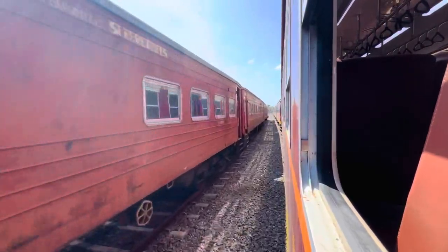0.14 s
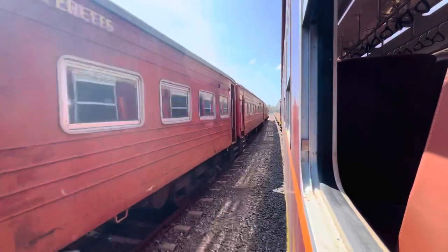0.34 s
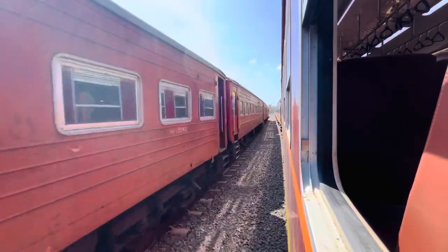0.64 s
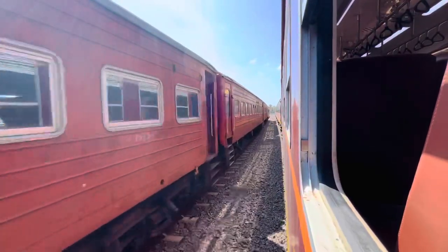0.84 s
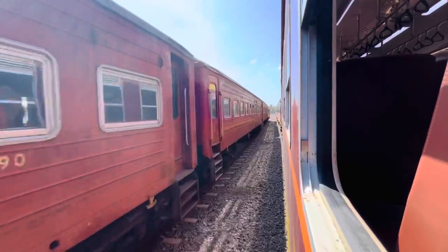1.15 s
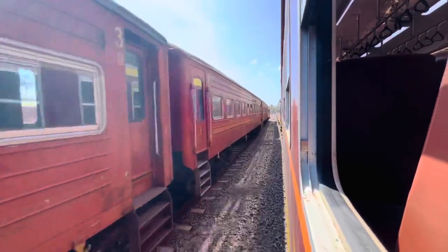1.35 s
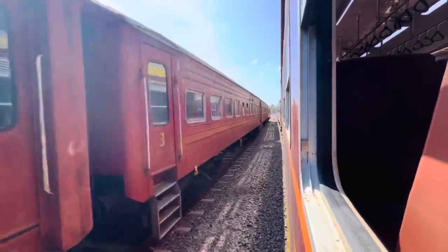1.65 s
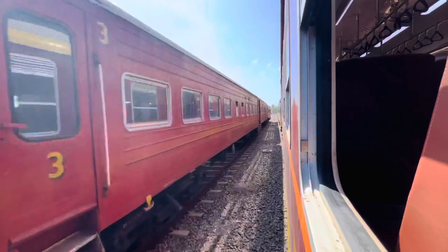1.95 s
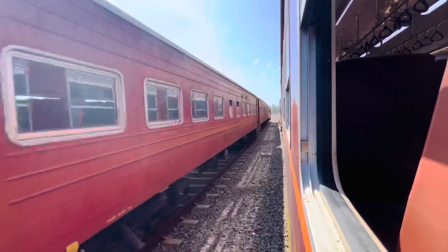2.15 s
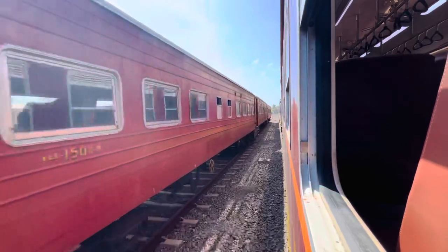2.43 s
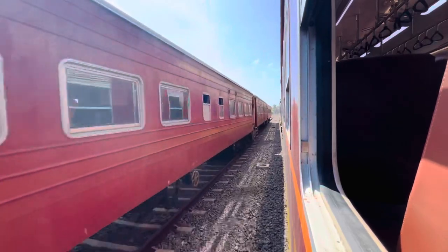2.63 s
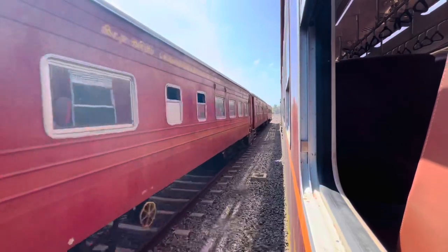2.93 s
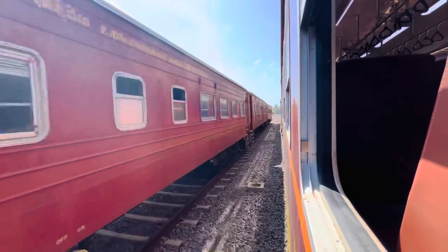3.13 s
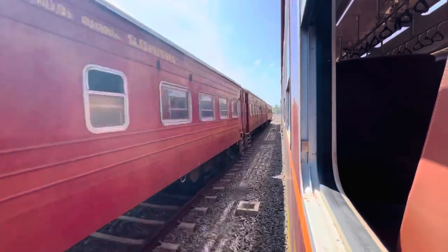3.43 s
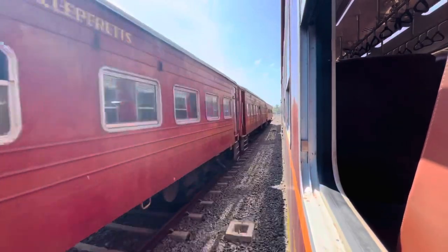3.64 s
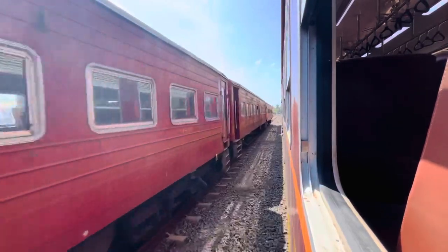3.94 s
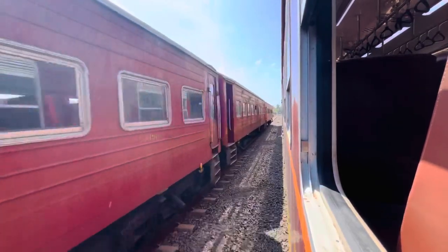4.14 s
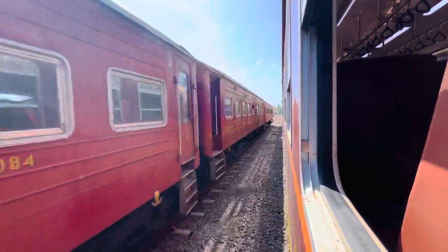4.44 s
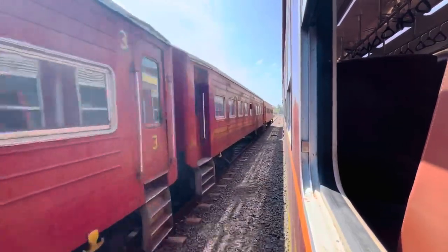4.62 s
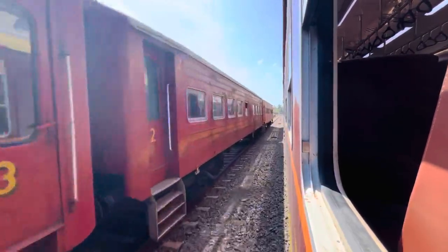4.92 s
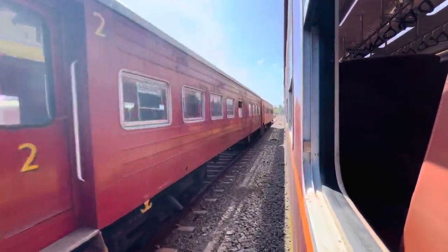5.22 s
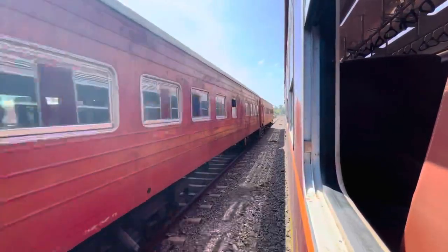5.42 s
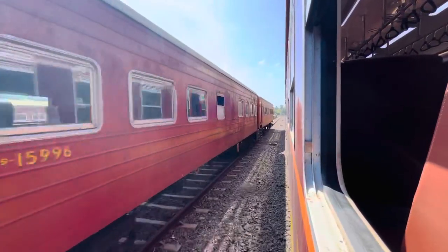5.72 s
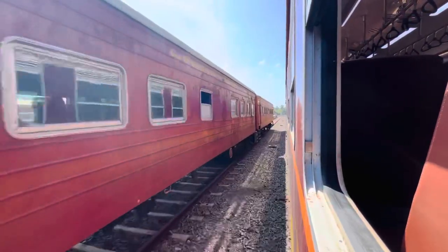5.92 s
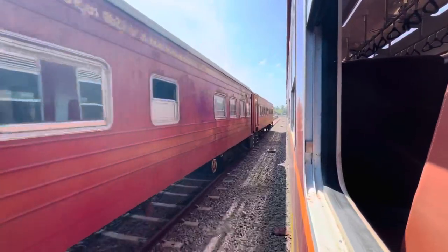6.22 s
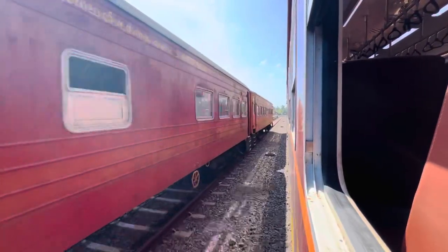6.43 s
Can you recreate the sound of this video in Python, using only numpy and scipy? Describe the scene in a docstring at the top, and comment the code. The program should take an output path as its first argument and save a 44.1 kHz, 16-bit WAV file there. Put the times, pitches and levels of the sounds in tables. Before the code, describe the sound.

Train carriages roll slowly past an open window, about two metres away and slightly to the left. A low rumble continues throughout under a gritty hiss of wheels scraping the rail, while thin, high squeals swell and fade. Several sharp clacks over a rail joint come in the first half. The scraping and squealing grow loudest past the middle, with a few more ringing clacks and thuds, then ease a little.

```python
"""A low rumble and a gritty hiss, with thin squeals on top: a train of carriages creeps past an open
window, two metres away on the left. The wheels rumble as they roll, and their flanges (the lips that
keep them on the track) scrape the rail. Axles clack over a rail joint, and the scraping sets the wheel
rims squealing at their own pitches. Below 8 kHz the left side is heard slightly ahead of the right."""
import sys
import numpy as np
from scipy import signal
from scipy.fft import rfft, irfft, next_fast_len
from scipy.io import wavfile
from scipy.ndimage import uniform_filter1d

SR = 44100
rng = np.random.default_rng(int(sys.argv[2]) if len(sys.argv) > 2 else 0)


def inscribe(sig):
    """Save sig as 16-bit PCM at rate SR to the path in sys.argv[1].

    A 1-D sig is mono; a 2-D sig holds one channel per row.
    Samples are clipped to [-1, 1] before scaling.
    """
    pcm = np.round(np.clip(np.atleast_2d(sig).T, -1, 1) * 32767)
    wavfile.write(sys.argv[1], SR, pcm.astype(np.int16))


N = 289737


def from_db(db):
    """Turn decibels into a number to multiply by."""
    return 10 ** (np.asarray(db) / 20)


def rms_one(x):
    """Scale a signal so that its average power is 1."""
    return x / np.sqrt(np.mean(x ** 2) + 1e-20)


def in_time(rows):
    """Join timed rows with straight lines: one curve for each column after the time."""
    times, *columns = np.transpose(rows)
    return [np.interp(np.arange(N) / SR, times, column) for column in columns]


def at_hz(points, hz):
    """Look up a value between the rows of a table of pitches, going by octaves."""
    pitches, values = np.transpose(points)
    return np.interp(np.log(hz), np.log(pitches), values)


def drift(rate):
    """A random curve of typical size 1 that turns about rate times a second."""
    step = 40   # samples between points of the curve
    r = np.exp(-2 * np.pi * rate * step / SR)
    slow = signal.lfilter([1], [1, -2 * r, r * r], rng.standard_normal(N // step + 2002))[2000:]
    return np.interp(np.arange(N) / step, np.arange(len(slow)), rms_one(slow))


def resonate(x, hz, width_hz):
    """Make a signal ring at one pitch; the narrower the width, the longer it rings."""
    r = np.exp(-np.pi * width_hz / SR)
    gain = (1 - r * r) / 2
    return signal.lfilter([gain, 0, -gain], [1, -2 * r * np.cos(2 * np.pi * hz / SR), r * r], x)


def spread(pair, alike, pan_db):
    """Mix two signals into left and right: alike at 1 gives both one wave, pan_db favours the left."""
    alike = np.clip(alike, 0, 1)
    both = np.sqrt(1 + alike) * pair[0] + np.sqrt(1 - alike) * pair[1] * [[1], [-1]]
    return both * from_db([[pan_db / 2], [-pan_db / 2]])


# How alike the two sides sound. Each row: pitch in Hz, likeness from 0 to 1.
SIDES_ALIKE = [(60, 0.82), (300, 0.78), (700, 0.31), (1500, 0.5), (3000, 0), (6000, 0), (10000, 0.86),
               (14000, 0.06)]
# How far the sound leans left. Each row: pitch in Hz, left level over right in dB.
LEFT_LOUDER = [(60, -0.5), (150, 0), (380, 4), (950, 3.5), (2380, 0.5), (5960, 3), (15000, -2.5)]


def banded_noise(spectrum, patchy_db, flicker_hz, tilt_db=0, pivot_hz=1000):
    """Stereo noise in flickering bands; tilt_db brightens it by that much per octave around pivot_hz."""
    hz_from, hz_to = spectrum[0][0], min(spectrum[-1][0], .45 * SR)
    edges = np.geomspace(hz_from, hz_to, 2 + int(3 * np.log2(hz_to / hz_from)))   # about 3 to an octave
    white = rng.standard_normal((2, 2, N))
    together = drift(flicker_hz / 2)
    out, power = 0, 0
    for k, (low, high) in enumerate(zip(edges, edges[1:])):
        hz = np.sqrt(low * high)
        band = signal.sosfilt(signal.butter(2, [low, high], "band", fs=SR, output="sos"), white[k % 2])
        band = spread(band, at_hz(SIDES_ALIKE, hz), at_hz(LEFT_LOUDER, hz))
        band *= from_db(at_hz(spectrum, hz))
        power += np.mean(band ** 2)
        flicker_db = patchy_db * (0.15 * together + drift(flicker_hz))
        out = out + band * from_db(tilt_db * np.log2(hz / pivot_hz) + flicker_db)
    return out / np.sqrt(power)


# How the rolling rises and falls. Each row: time in seconds, rumble level in dB, roar level in dB,
# rumble brightness in dB per octave.
ROLLING_LEVELS = [(0.0, -29.5, -32, -6), (0.6, -27.5, -33.5, -2), (1.4, -28, -31, -11),
                  (2.0, -27.5, -32.5, -3.5), (3.0, -30, -32, -1.5), (3.6, -27, -32, -3.5),
                  (4.4, -31, -31, 3), (4.55, -28, -30.5, -6), (4.95, -34, -30.5, 2),
                  (5.5, -30.5, -33.5, 7.5), (5.95, -28, -32, -3), (6.57, -34.5, -33, 5)]
# The tone of the car bodies' rumble. Each row: pitch in Hz, relative level in dB.
RUMBLE_TONE = [(32, -16), (45, -2.5), (57, 3), (75, 2.5), (100, 4), (130, -1.5), (200, -33), (280, -12)]
# The tone of the wheels' roar. Each row: pitch in Hz, relative level in dB.
ROAR_TONE = [(130, -16), (200, -5), (290, -17), (370, -11.5), (640, -15.5), (800, -17), (1090, -16.5),
             (2200, -24), (2700, -22.5), (3300, -37), (4200, -19.5)]
# Wheel and rail humming. Each row: pitch in Hz, width in Hz, level against the roar in dB.
STEEL_HUMS = [(375, 32, -14.5), (770, 53, -13.5), (1708, 15, -22.5), (2260, 8.4, -21), (72.4, 29, -6)]


def rolling():
    """Rough wheels roll on the rail: the car bodies rumble, and the steel hums faintly in the roar."""
    rumble_db, roar_db, tilt_db = in_time(ROLLING_LEVELS)
    roar = banded_noise(ROAR_TONE, patchy_db=2.0, flicker_hz=11.1)
    for hz, width_hz, level_db in STEEL_HUMS:
        hum = rms_one(resonate(rng.standard_normal((2, N)), hz, width_hz))
        roar += from_db(level_db) * spread(hum, at_hz(SIDES_ALIKE, hz), at_hz(LEFT_LOUDER, hz))
    rumble = banded_noise(RUMBLE_TONE, patchy_db=2.5, flicker_hz=24.0, tilt_db=tilt_db, pivot_hz=79.5)
    return from_db(rumble_db) * rumble + from_db(roar_db) * roar


# How loud and bright the hiss is; it jumps up abruptly near 4.5 s.
# Each row: time in seconds, hiss level in dB, brightness in dB per octave.
SCRAPE_LEVELS = [(0.0, -29.5, -2), (0.35, -34.5, 0.5), (0.99, -35.5, 0.5), (1.06, -28, -1.5),
                 (1.17, -25, -3.5), (1.21, -24, -1), (1.3, -26.5, -2), (1.45, -28.5, 0.5),
                 (2.0, -30.5, -9.5), (2.25, -36.5, -6.5), (2.4, -34, -2.5), (2.8, -38.5, -1),
                 (3.16, -37.5, 1), (3.52, -33.5, -2), (3.56, -31.5, 2.5), (3.7, -26, -3), (3.83, -31, 1),
                 (3.85, -24.5, -4), (3.95, -22.5, -5.5), (4.08, -22, -7), (4.14, -27, -4.5),
                 (4.25, -35, -3), (4.47, -41, 2), (4.49, -24.5, -4.5), (4.6, -26.5, -4), (4.66, -19.5, -4),
                 (4.78, -19, -9.5), (4.88, -24.5, -4.5), (4.99, -20.5, -7.5), (5.15, -21, -4.5),
                 (5.3, -22.5, -6.5), (5.55, -29, -6.5), (5.95, -27, -1), (6.25, -26.5, -5),
                 (6.45, -27.5, -7.5), (6.57, -37.5, -1)]
# The tone of the hiss. Each row: pitch in Hz, relative level in dB.
HISS_TONE = [(2500, -19.5), (3400, -12), (4000, -7.5), (5200, -1), (6800, 3), (8400, -3), (10000, 1),
             (12500, -9.5), (14500, 0)]
# Faint ringing of the wheels. Each row: pitch in Hz, width in Hz, level against the hiss in dB.
WHEEL_WHISTLES = [(2900, 160, -24), (3350, 120, -25), (3830, 120, -19), (4900, 120, -24), (6900, 200, -20),
                  (13650, 300, -12)]


def scrape():
    """Flanges grind along the rail: a bright, gritty hiss with faint whistles."""
    hiss_db, tilt_db = in_time(SCRAPE_LEVELS)
    hiss = banded_noise(HISS_TONE, patchy_db=1.6, flicker_hz=7.0, tilt_db=tilt_db, pivot_hz=6000)
    for hz, width_hz, level_db in WHEEL_WHISTLES:
        whistle = rms_one(resonate(rng.standard_normal(N), hz, width_hz))
        hiss += from_db(level_db + tilt_db * np.log2(hz / 5200) + 3.0 * drift(3.1)) * whistle
    hiss *= from_db(hiss_db + drift(33))   # a fast flicker makes it gritty
    return signal.sosfilt(signal.ellip(8, .5, 40, 13900, fs=SR, output="sos"), hiss)   # cut the very top


def favour(hz, favoured_hz, boost_db, octaves):
    """A gain that makes pitches near the favoured one stand out."""
    return from_db(boost_db * np.exp(-(np.log2(hz / favoured_hz) / octaves) ** 2))


TICK_LEAD_S = .009   # the tick comes this long before the blow


def wheel_knocks(t, rattle_s, blow_db):
    """A wheel drops over the gap: a light tick, a hard blow, then uneven knocks that die away."""
    tick_db, strike_db, fade_db_per_s = -11, 13, 100
    attack_s, blow_s, settle_s = .005, .014, .02
    age = t - TICK_LEAD_S
    onset = np.where(age < 0, from_db(tick_db), np.clip(0.37 + age / attack_s, 0, 1))
    blow = from_db(blow_db * (age > 0) * np.exp(-age / blow_s))
    settle_db = -4.0 * (1.5 - np.exp(-np.maximum(age - rattle_s, 0) / settle_s))
    shape = onset * blow * from_db(settle_db - fade_db_per_s * t)
    uneven = from_db(1.05 * np.repeat(rng.standard_normal(len(t) // 126), 126))   # 3 ms for each knock
    knocks = rng.standard_normal((2, len(t))) * shape * uneven
    knocks[0, round((TICK_LEAD_S + attack_s) * SR)] += from_db(strike_db + blow_db)   # one hard contact
    return knocks


# The tone of the rattle. Each row: pitch in Hz, relative level in dB.
RATTLE_TONE = [(71, -52), (120, -0.5), (425, 1), (718, -3.5), (844, 1.5), (941, -6), (1070, -4),
               (1600, -11.5), (2450, -16), (2880, -12), (3270, -14), (4500, -14.5), (6050, -19),
               (9000, -26), (11700, -63), (19800, -120)]


def bogie_rattle(knocks, t, tilt_db, favoured_hz):
    """The knocks shake the bogie, the frame that holds the wheels; the treble dies first."""
    hz = np.fft.rfftfreq(len(t), 1 / SR) + 1
    colour = from_db(at_hz(RATTLE_TONE, hz) + tilt_db * np.log2(np.clip(hz, 100, 9000) / 800))
    colour *= favour(hz, favoured_hz, boost_db=4, octaves=.7)
    rattle = irfft(rfft(knocks) * rms_one(colour), len(t))
    treble = signal.sosfilt(signal.butter(2, 2200, "high", fs=SR, output="sos"), rattle)
    return rattle - treble * (1 - from_db(-200 * t))


# The notes of struck wheel and rail. Each row: pitch in Hz, relative level in dB, seconds to fade 60 dB.
STEEL_NOTES = [(180, 0, .1), (250, -1, .1), (350, -2, 0.16), (452, 1, .14), (575, 1, 0.12), (795, 1.5, .11),
               (1050, -3, .06), (1220, -1, 0.07), (1620, -10, 0.05), (1850, -9, .05), (2240, -6, 0.07),
               (2845, -3, 0.09), (4150, -13, 0.04)]


def steel_ring(knocks, tilt_db, high_db, favoured_hz):
    """Wheel and rail ring at their own pitches; each blow strikes each note with its own strength."""
    ring = 0
    for hz, level_db, fade_s in STEEL_NOTES:
        width_hz = np.log(1000) / (np.pi * fade_s)
        bright_db = high_db * (hz > 1400) + tilt_db * np.log2(hz / 800)
        strength = from_db(level_db + bright_db + rng.normal(0, 2))
        strength *= favour(hz, favoured_hz, boost_db=6, octaves=.3)
        ring = ring + strength * resonate(knocks, hz, width_hz)
    return ring


# Axles crossing the joint. Each row: start in seconds, rattle gain in dB, thud gain in dB, ring gain on
# top of the rattle's in dB, brightness in dB per octave, seconds until the rattle settles, blow boost
# in dB, boost of the high steel notes in dB, favoured pitch in Hz, boom level in dB, boom delay in seconds.
AXLE_HITS = [(0.676, -17, -1, 8.5, 2, 0.062, 4.5, 5.5, 445, -15, 0.047),
             (0.925, -37.5, -15, -3, -7, 0.012, 15.5, -6, 260, -19, 0.0069),
             (1.229, -15, 0.5, 9.5, 1, 0.045, 3.5, 6, 179, -25, .035),
             (2.12, -17, -12, 5.5, 1, 0.044, 6, 5.5, 524, -19, 0.039),
             (2.189, -41.5, -18, 0, -14.5, 0.015, 8, -6, 260, -22, .008),
             (2.66, -21.5, -26, 13, 2, 0.06, 4.5, -1.5, 1400, -16.5, 0.035),
             (3.116, -31.5, -21, 9.5, -4, 0.026, 4, -6, 360, -20, 0.028),
             (4.486, -50, -22, 8, -5, 0.055, 5, -10, 260, -18.5, 0.016),
             (4.579, -28, -16, 26, -0.5, 0.036, -9.5, -20, 1260, -18, 0.0533),
             (4.879, -36.5, -21, -27, -16, 0.078, 7, -10, 180, -20.5, 0.0045),
             (5.106, -24.5, -5, 11.5, 0, 0.038, 3.5, -17, 589, -20, 0.024),
             (5.948, -35, -7, 13, 0, 0.049, 7, -15, 260, -20, 0.018)]


def clacks():
    """Axles hit the rail joint: the bogie rattles, steel rings, and the car body thuds and booms."""
    boom_hz, boom_s = 91, 0.0096
    t = np.arange(SR // 2) / SR
    out = np.zeros((2, N + SR))
    for (start, rattle_db, thud_db, ring_db, tilt_db, rattle_s,
         blow_db, high_db, favoured_hz, boom_db, boom_delay) in AXLE_HITS:
        knocks = wheel_knocks(t, rattle_s, blow_db)
        metal = bogie_rattle(knocks, t, tilt_db, favoured_hz)
        metal += from_db(ring_db) * steel_ring(knocks, tilt_db, high_db, favoured_hz)
        thud = resonate(resonate(knocks, hz=117, width_hz=157), hz=117, width_hz=157)
        boom_age = t - TICK_LEAD_S - boom_delay
        boom = np.exp(-(boom_age / boom_s) ** 2) * np.cos(2 * np.pi * (boom_hz * boom_age + rng.random()))
        hit = from_db(rattle_db) * spread(metal, alike=0.42, pan_db=3.3)
        hit += from_db(thud_db) * spread(thud, alike=1, pan_db=0) + from_db(boom_db) * boom
        at = round((start - TICK_LEAD_S) * SR)
        out[:, at:at + len(t)] += hit
    return signal.sosfilt(signal.butter(2, 6000, fs=SR, output="sos"), out[:, :N])   # dull the top


def squeal_power(rows):
    """The power over time of squeals that swell, hold and fade."""
    t = np.arange(N) / SR
    power = 0
    for full_at, held_s, level_db, swell, fade in rows:
        drop_db = swell * np.maximum(full_at - t, 0) + fade * np.maximum(t - full_at - held_s, 0)
        power = power + from_db(level_db - drop_db) ** 2
    return power


# The pitches in Hz at which the wheel rims ring, from low to high.
RIM_PITCHES = [1590, 4362, 5975, 7625, 9347, 11312, 12000]
# Each rim note is a narrow core inside a wider band of noise, its skirt. Each row: base width of the
# skirt in Hz, left level over right in dB, likeness of the sides from 0 to 1, quiet ringing against
# the hiss in dB, core width in Hz, core level against the skirt in dB.
RIM_TONES = [(26, 11, 0.4, -37, 20, -11), (48.3, 3.5, 0.34, -21.5, 23, -4), (95, 3.5, 0.34, -34, 39, 0.5),
             (118, 6, 0.03, -20, 22, -5), (221, -6.5, 0, -38, 16, -11), (300, -2, 0.8, -25, 20, -13),
             (150, 0, 1, -39, 36, -9)]
# The squeals, one list for each rim note. Each row: time it reaches full strength in seconds, seconds
# held, level in dB, swell in dB per second, fade in dB per second.
RIM_SQUEALS = [
    [(6.28, 0.093, -46, 200, 150)],
    [(1.07, 0.26, -36, 200, 45), (1.5, .12, -37.5, 60, 50), (1.7, .08, -40, 60, 400)],
    [(0.0, 0.17, -34.5, 100, 39), (0.46, 0.44, -28, 74, 35), (1.33, 0.19, -25.5, 78, 80),
     (1.8, 0.21, -37, 36, 42), (2.3, 0.05, -34, 154, 22), (2.45, 0.11, -41, 50, 120),
     (3.6, 0.18, -24.5, 400, 44), (3.95, 0.17, -30, 30, 42), (4.58, 0.073, -25, 150, 53),
     (4.85, 0.053, -14.5, 305, 73), (5.05, 0.15, -19.5, 72, 65), (5.63, 0.029, -31.5, 42, 62),
     (6.0, 0.29, -36, 32, 16)],
    [(0.1, 0.16, -28.5, 143, 59), (1.2, 0.41, -40.5, 5, 52), (2.62, 0.07, -43, 19, 29.5),
     (3.09, 0.0099, -35.5, 49, 84), (3.4, 0.073, -29, 72, 27), (3.91, 0.22, -18.5, 83, 44),
     (4.69, 0.07, -21.5, 103, 87), (5.09, 0.12, -25.5, 67, 53), (5.7, 0.075, -30, 46, 46),
     (6.2, 0.3, -23.5, 41, 52)],
    [(0.08, .05, -44, 60, 32), (1.17, .05, -40, 60, 35), (1.9, 0.039, -42, 48, 35),
     (2.9, .2, -47.5, 50, 20), (3.28, 0.11, -36.5, 89, 70), (3.95, 0.094, -34, 23, 48),
     (4.65, 0.49, -34.5, 69, 21), (5.23, 0.16, -29, 43, 24), (5.85, 0.82, -37, 42, 19)],
    [(3.2, .2, -48, 90, 34), (5.46, 0.073, -37.5, 100, 39), (5.84, .03, -53, 53, 65),
     (6.15, 0.077, -32, 55, 50)],
    [(0.0, 0.2, -46, 50, 50), (0.5, 0.13, -40.5, 64, 42), (1.4, 0.092, -42.5, 25, 24),
     (1.65, 0.53, -44, 27, 56), (3.2, 0.056, -40, 150, 37), (3.64, .05, -43, 40, 27),
     (4.15, .05, -41.5, 25, 32), (4.9, 0.13, -36, 46, 29), (5.45, 0.079, -27.5, 150, 40),
     (5.6, 0.18, -26, 64, 21)],
]


def squeal():
    """Wheels stick and slip on the rail: the rims ring quietly with the scraping and at times squeal."""
    steadiness = .5   # how far stick and slip evens out the core, from 0 to 1
    hiss_db = in_time(SCRAPE_LEVELS)[0]
    out = 0
    for hz, rim_tone, rows in zip(RIM_PITCHES, RIM_TONES, RIM_SQUEALS):
        width_hz, pan_db, alike, quiet_db, core_hz, core_db = rim_tone
        skirt = rng.standard_normal((2, N))
        for _ in range(3):
            skirt = resonate(skirt, hz, 3.63 * width_hz)   # each pass narrows the band
        core = rms_one(resonate(skirt, hz, core_hz))
        core_power = uniform_filter1d(core ** 2, size=88)   # averaged over 2 ms
        core /= (.05 + core_power) ** (steadiness / 2)
        tone = rms_one(rms_one(skirt) + from_db(core_db) * rms_one(core))
        strength = np.sqrt(squeal_power(rows) + from_db(hiss_db + quiet_db) ** 2)
        flutter = from_db(.8 * drift(18) + .7 * drift(6.8))   # a fast flutter and a slower waver
        out = out + strength * flutter * spread(tone, alike, pan_db)
    return out


def scene():
    """All the sounds of the train, added together in stereo."""
    return rolling() + scrape() + squeal() + clacks()


# Phase between the sides: the left leads below 8 kHz, the highs are in step, the very top is opposed.
# Each row: pitch in Hz, phase in radians (2 pi is one cycle).
SIDE_PHASE = [(0, 0), (8100, 7 * np.pi), (8900, 6 * np.pi), (13800, 6 * np.pi), (13950, 5 * np.pi)]


def record(dry):
    """Shift the phase of the right side, cut the deepest bass and the top, and round off the peaks."""
    ceiling, cutoff_hz = 1.05, 15570
    size = next_fast_len(N + 4096)
    phase = np.interp(np.fft.rfftfreq(size, 1 / SR), *np.transpose(SIDE_PHASE))
    right = irfft(rfft(dry[1], size) * np.exp(-1j * phase), size)[:N]
    heard = signal.sosfilt(signal.butter(3, 36, "high", fs=SR, output="sos"), [dry[0], right])
    heard = ceiling * np.tanh(heard / ceiling)
    top_cut = signal.cheby2(12, 70, cutoff_hz * 1.02, fs=SR, output="sos")   # 70 dB down just past cutoff
    return signal.sosfilt(top_cut, heard)


dry = scene()
out = record(dry)
inscribe(out)
```